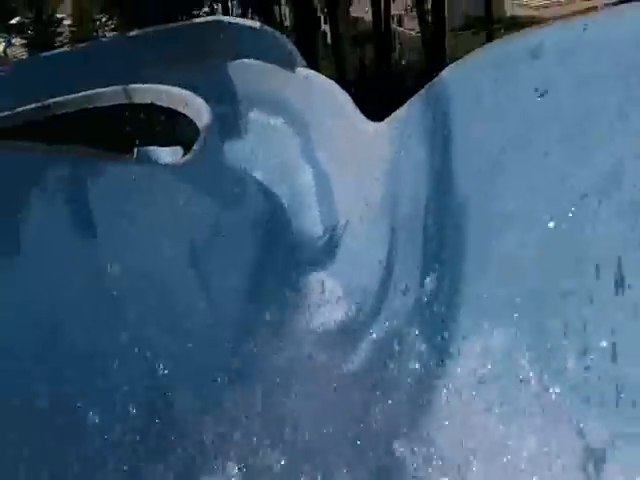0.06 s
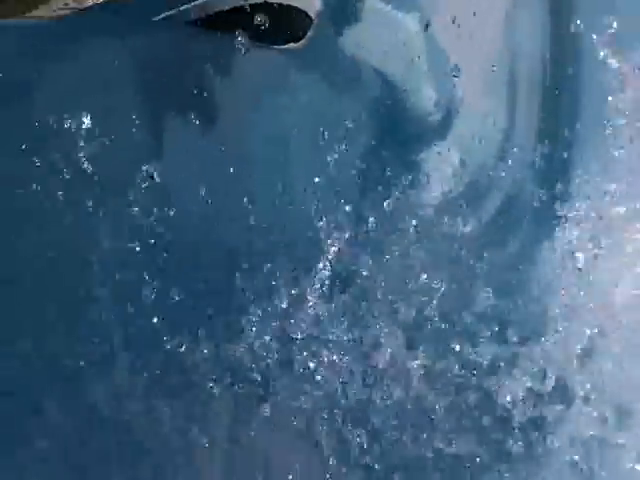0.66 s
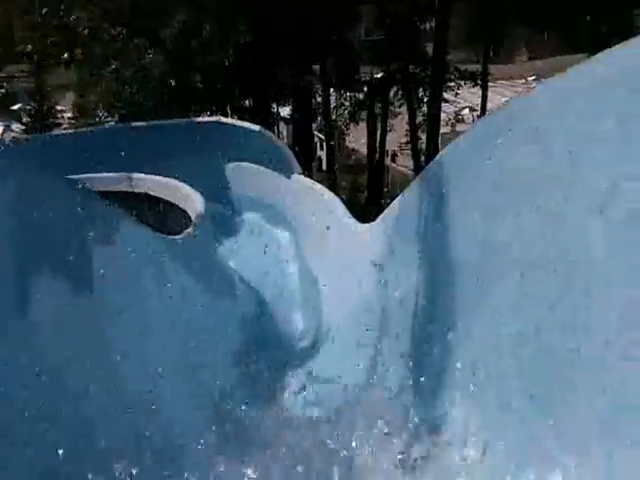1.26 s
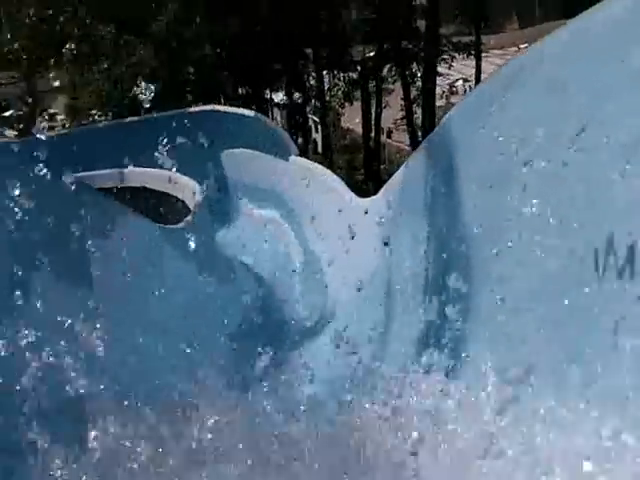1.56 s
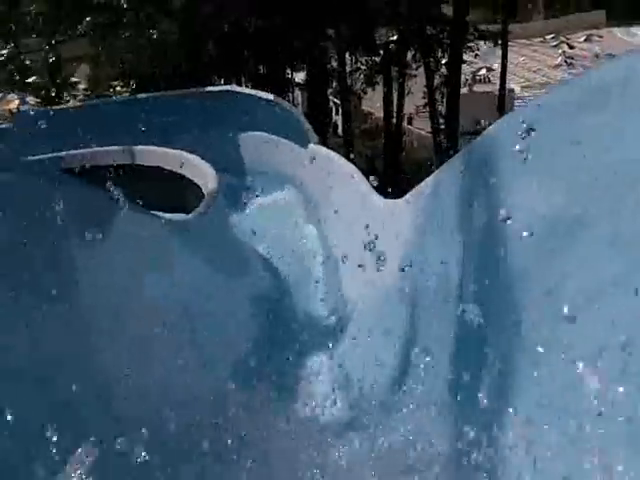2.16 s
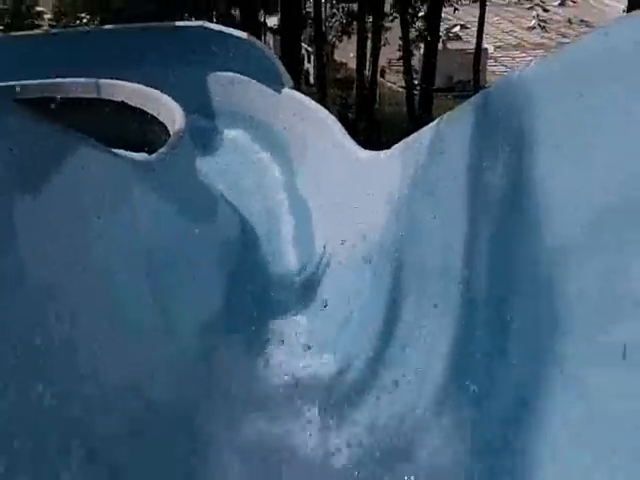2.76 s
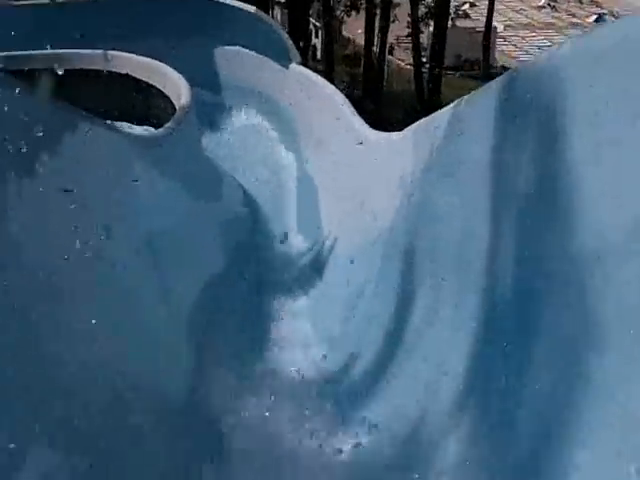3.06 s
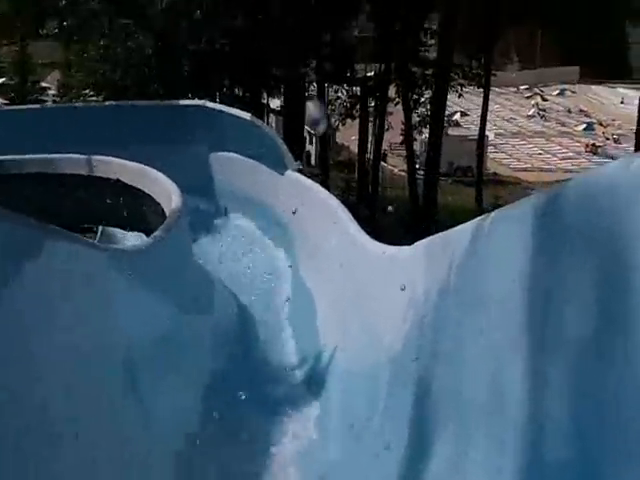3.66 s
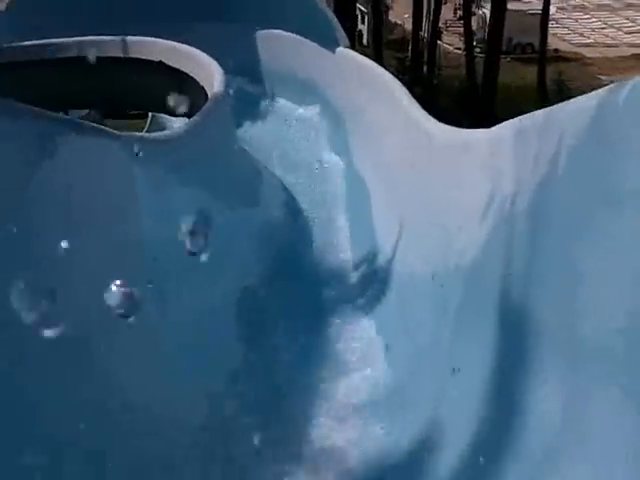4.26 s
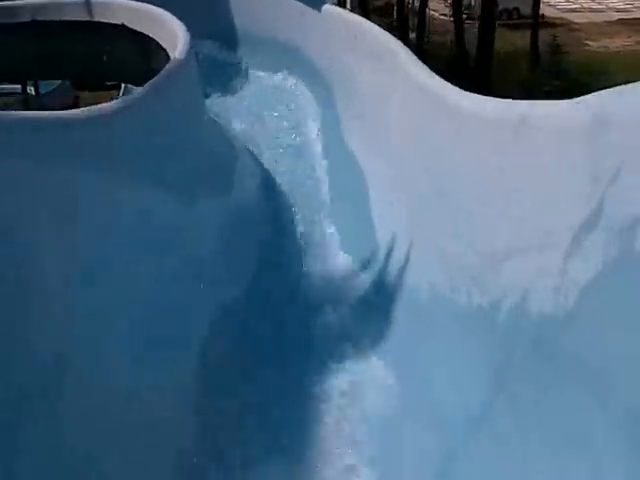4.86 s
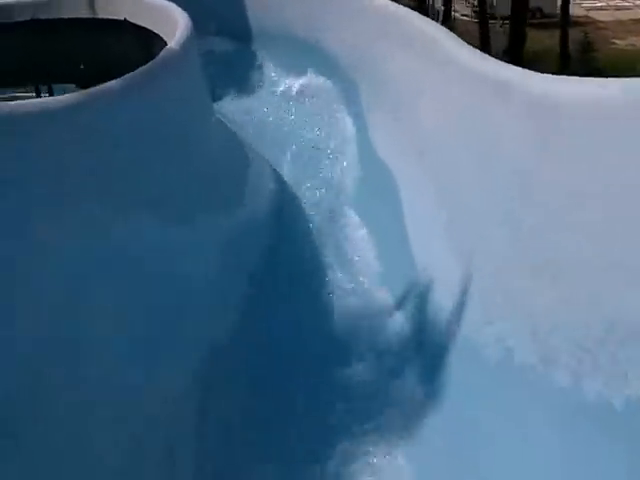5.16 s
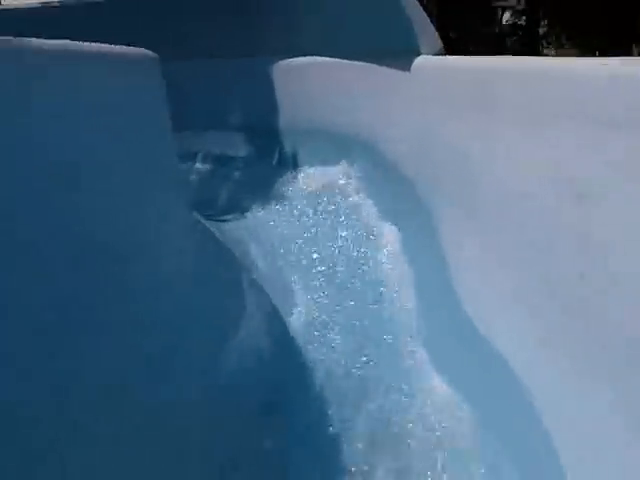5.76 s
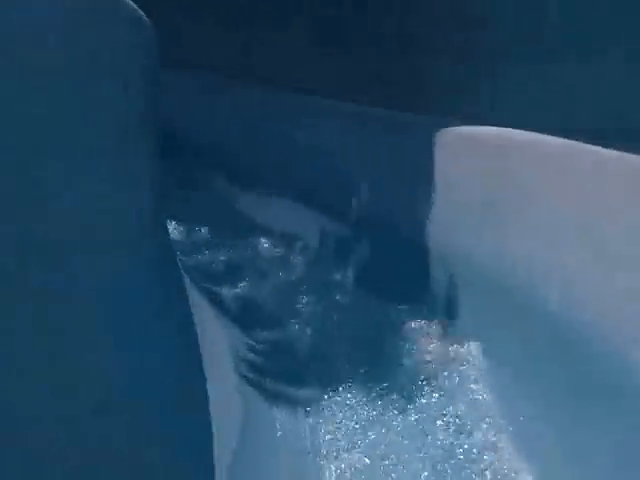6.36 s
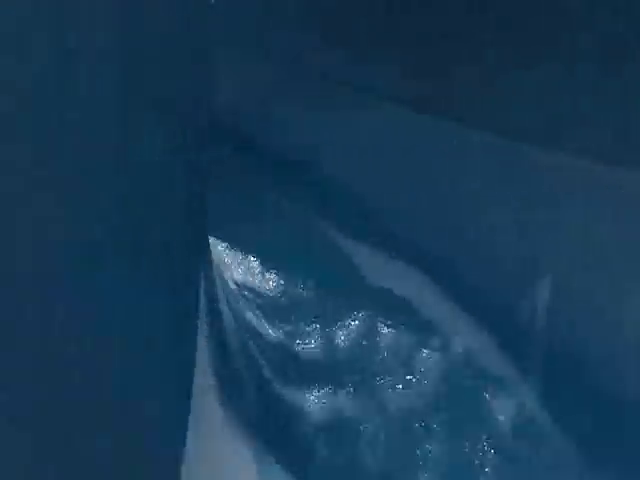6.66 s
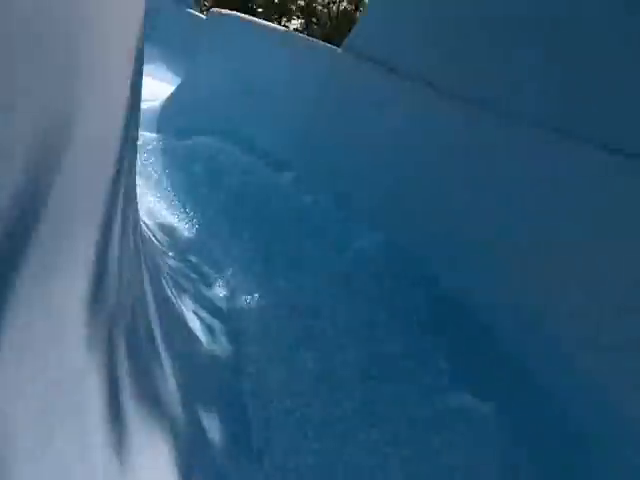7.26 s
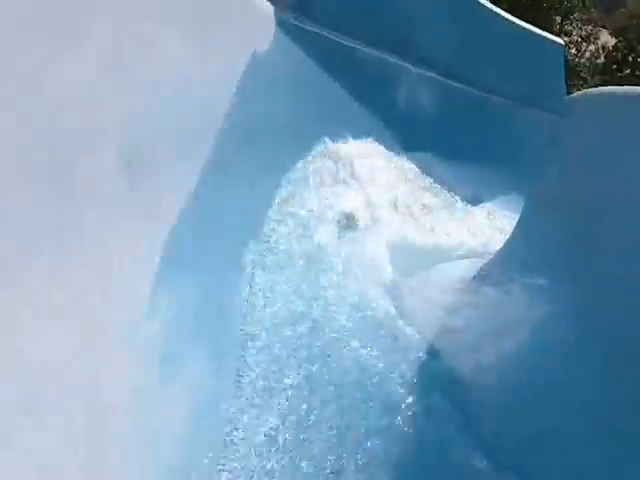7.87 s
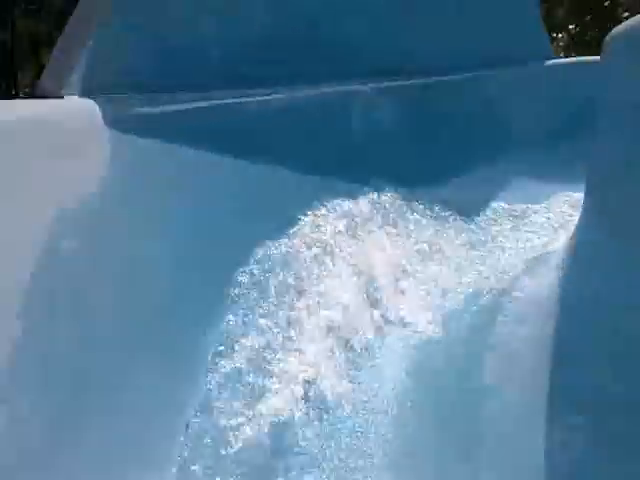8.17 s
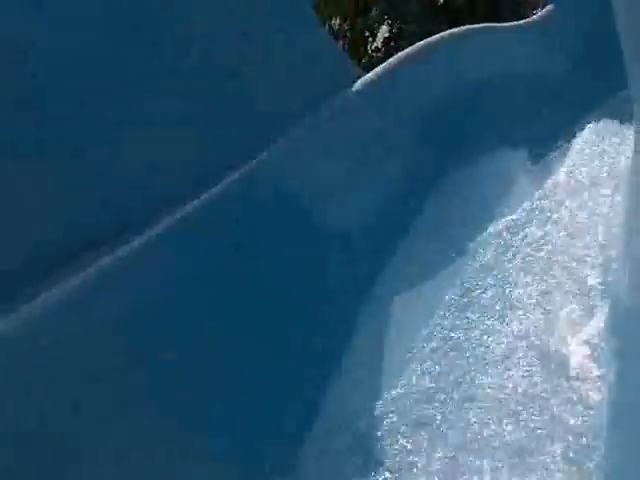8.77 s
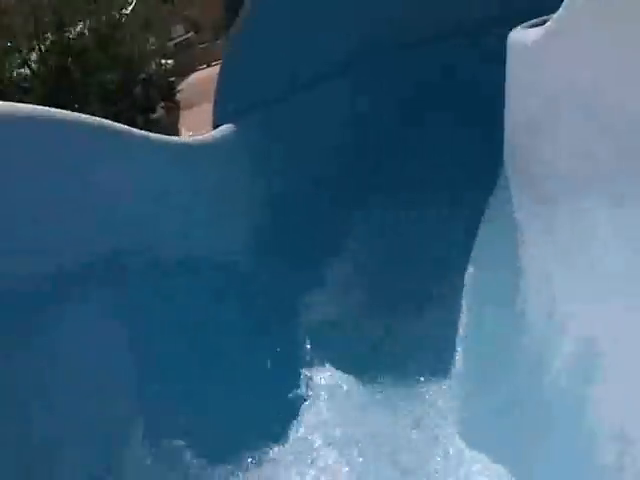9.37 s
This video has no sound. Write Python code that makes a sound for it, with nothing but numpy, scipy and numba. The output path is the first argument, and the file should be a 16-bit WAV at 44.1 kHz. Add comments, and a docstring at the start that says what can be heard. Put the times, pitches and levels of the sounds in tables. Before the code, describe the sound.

Rushing, bubbling water and spattering spray on a ride down a water slide, with wind buffeting the microphone in the second half.

```python
"""Riding a water slide

Water rushes down an open plastic slide, heard from a camera carried along just above the stream.
At first it churns and sprays close by: dense bubbles and droplets over a hiss of foam, with sloshes,
spatters and a few deep gulps of trapped air. From about 5.5 s wind rumbles and thumps on the
microphone, and the camera's gain control ducks the water at every strong gust."""
import sys
import numpy as np
from scipy import signal
from scipy.fft import rfft, irfft
from scipy.io import wavfile
from scipy.ndimage import uniform_filter1d
from numba import njit

SR = 44100
rng = np.random.default_rng(int(sys.argv[2]) if len(sys.argv) > 2 else 0)


def wav_out(sig):
    """Save sig, one row per channel (or a flat mono array), as 16-bit PCM at SR to the path in sys.argv[1]."""
    wavfile.write(sys.argv[1], SR, np.round(np.clip(np.atleast_2d(sig).T, -1, 1) * 32767).astype(np.int16))


N = 423360
T = np.arange(N) / SR
FREQS = np.fft.rfftfreq(N, 1 / SR)


def undb(db):
    """Decibels to gain."""
    return 10 ** (np.asarray(db) / 20)


def unit(x):
    """Scale to rms 1."""
    return x / np.sqrt(np.mean(x ** 2))


def curve(rows, column=1):
    """An automation curve: one column of a table, joined by straight lines in time."""
    rows = np.asarray(rows)
    return np.interp(T, rows[:, 0], rows[:, column])


def colour(x, points):
    """Shape a sound with an EQ curve of (frequency [Hz], gain [dB]) points, then scale to rms 1."""
    hz, db = np.transpose(points)
    eq = undb(np.interp(np.log(FREQS + 1), np.log(hz), db))
    return unit(irfft(rfft(x) * eq, N))


def split(x, hz, order=3):
    """Crossover: the parts of a sound below and above a frequency."""
    low = irfft(rfft(x) / (1 + (FREQS / hz) ** (2 * order)), N)
    return low, x - low


def wander(rate_hz):
    """Random modulation at rms 1, gliding to a new value rate_hz times a second."""
    hold = max(int(SR / rate_hz), 2)
    steps = rng.standard_normal(N // 20)[np.arange(N) // hold % (N // 20)]
    return unit(uniform_filter1d(steps, hold))


def decay(hits, decay_s):
    """Give every impulse an exponential tail."""
    return signal.lfilter([1], [1, -np.exp(-1 / (decay_s * SR))], hits)


@njit
def ring(starts, hz, cycles, amplitudes, glide):
    """Bubbles: damped sines that fall 60 dB over their cycles and rise in pitch near the surface."""
    out = np.zeros(N)
    for k in range(len(starts)):
        first, length = int(starts[k] * SR), int(cycles[k] * SR / hz[k]) + 1
        turn = 2 * np.pi * hz[k] / SR
        phasor = amplitudes[k] + 0j
        step = np.exp(1j * turn - np.log(1000) / length)
        bend = np.exp(1j * turn * glide / length)
        for i in range(first, min(first + length, N)):
            phasor *= step
            step *= bend
            out[i] += phasor.imag
    return out


def bubbles(count, low_hz, high_hz, cycles, spread_db, glide):
    """A cloud of bubbles of all sizes, most faint and a few loud, with equal power per Hz."""
    when, pitch, life, luck, polarity = rng.random((count, 5)).T
    hz = low_hz + (high_hz - low_hz) * pitch  # small bubbles far outnumber big ones
    amplitudes = np.sign(polarity - .5) * np.sqrt(hz) * undb(-spread_db * np.log(luck + .02))
    return unit(ring(when * N / SR, hz, cycles * (.5 + life), amplitudes, glide))


def slaps(count, decay_s, spread_db):
    """Water slaps the chute, each hit throwing a short burst of droplets."""
    when, luck = rng.random((count, 2)).T
    strength = undb(-spread_db * np.log(luck + .01))
    power = decay(np.bincount((when * N).astype(int), strength ** 2, N), decay_s)
    return unit(np.sqrt(power) * rng.standard_normal(N))


def water():
    """The rush of foam, bubbles, droplets and slaps; deep churn and fine spray swell on their own."""
    # EQ of the rushing water: (frequency [Hz], gain [dB])
    water_eq = [(30, -22), (100, -2), (185, 0), (260, 0.5), (360, 3), (500, 0.16), (850, -2), (1100, -3),
                (2400, -4.5), (3300, -4), (4850, 0.16), (7000, -2), (9900, 1), (12000, -53)]
    # fader moves along the slide: (time [s], whole rush [dB], churn trim [dB], spray trim [dB])
    faders = [(0, -24, -5, 5.5), (.6, -24, 0, 1.5), (1.0, -25, -2.5, 4), (1.5, -25, -3.5, 5.5),
              (2.2, -24.5, -2, 5), (2.7, -25.5, -4, 6.5), (3.4, -24, -2, 4), (4.5, -24, -2, 3.5),
              (5.4, -24, -1, 2), (5.8, -26, -5, 0), (6.5, -25.5, -2, 2), (7.4, -26, -1, -1),
              (8.1, -24.5, -6.5, -0.5), (8.8, -26.5, -6.5, 1.5), (9.6, -27.5, 2, -1)]
    # brief swells as surges run past: (time [s], half length [s], swell [dB])
    surges = [(5.765, .025, 2.5), (5.965, .022, 3), (6.52, .03, 1), (7.06, .025, 1), (7.195, .02, 2),
              (7.805, .03, 1.5), (8.23, .025, 1.5), (8.725, .025, 1.5)]
    foam = undb(-3) * rng.standard_normal(N)
    gurgle = undb(-4.5) * bubbles(24000, 220.5, 5996, cycles=26, spread_db=2.5, glide=.2)
    droplets = undb(-3.5) * bubbles(50000, 894, 11640, cycles=3.95, spread_db=2.5, glide=.1)
    splashes = undb(-4) * slaps(4000, decay_s=0.0025, spread_db=1.5)
    stream = colour(foam + gurgle + droplets + splashes, water_eq)
    deep, rest = split(stream, hz=720)
    middle, rest = split(rest, hz=2900)
    fine, mist = split(rest, hz=6740, order=8)
    rush_db, churn_db, spray_db = (curve(faders, column) for column in (1, 2, 3))
    surge_db = sum(db * np.exp(-((T - s) / length) ** 2) for s, length, db in surges)
    deep = deep * undb(churn_db + 3.5 + 1.05 * wander(18))
    middle = middle * undb(1.74 - spray_db / 2 + 1.1 * wander(26))
    mist = mist * undb(spray_db - 17)  # the smallest drops fade first when the spray thins
    fine = (fine + mist) * undb(spray_db / 2 - 0.8 + 0.5 * wander(70))
    return (deep + middle + fine) * undb(rush_db + surge_db + 5 + 0.32 * wander(22))


def patter():
    """Spray rains back on the wet plastic: single sharp ticks of a few cycles."""
    # fader for the falling spray: (time [s], level [dB])
    fader = [(0, -32), (.65, -44.5), (1.4, -32), (3.0, -32), (4.4, -35), (5.6, -53.5), (9.6, -55)]
    ticks = bubbles(1500, 3000, 7000, cycles=6, spread_db=3.2, glide=.1)
    softened, _ = split(ticks, hz=9500, order=4)
    return softened * undb(curve(fader))


def wind_strength(wander_db=1.95, attack_s=0.008, release_s=0.016):
    """Level of the wind in dB: each gust rises quickly, holds and dies back into the breeze."""
    # the bed of breeze: (time [s], level [dB])
    breeze = [(0, -30.5), (1.35, -37), (2.2, -32.5), (3.3, -34), (4.0, -30), (4.7, -33.5), (5.4, -28),
              (6.1, -24), (7.3, -18), (7.9, -19), (8.6, -19), (9.05, -22), (9.6, -19.5)]
    # gusts on top of it: (start [s], hold [s], level [dB])
    gusts = [(0.567, 0.02, -27), (0.70, 0.05, -23), (.832, .012, -25), (2.735, 0.025, -26),
             (3.8, 0.13, -31), (4.46, .03, -22), (4.932, 0.03, -22), (5.055, .025, -21),
             (5.522, 0.034, -20.5), (5.63, 0.062, -13.5), (5.856, 0.02, -10), (5.982, 0.025, -11.5),
             (6.125, .025, -13.5), (6.205, 0.07, -12), (6.39, 0.045, -15), (6.598, .025, -8.5),
             (6.68, 0.02, -12.5), (6.726, 0.02, -13), (6.772, .02, -14), (6.845, 0.03, -13),
             (6.908, .025, -11), (6.975, .015, -15), (7.078, .014, -10), (7.136, 0.025, -15),
             (7.215, .04, -13.5), (7.286, 0.08, -3.5), (7.421, 0.125, -10.5), (7.625, 0.044, -9),
             (7.713, 0.026, -11.5), (7.822, 0.02, -10), (8.072, 0.08, -15), (8.258, 0.2, -12.5),
             (8.285, 0.045, -5.5), (8.52, 0.03, -9), (8.628, 0.055, -13), (8.76, 0.025, -13),
             (8.865, .018, -10), (9.003, 0.025, -16), (9.125, 0.032, -17), (9.198, 0.14, -19),
             (9.44, 0.07, -11), (9.576, 0.033, -14)]
    power = undb(curve(breeze) + wander_db * wander(12)) ** 2
    for start, hold, db in gusts:
        rise = np.clip(1 + (T - start) / attack_s, 0, 1)
        fall = np.exp(-np.clip((T - start - hold) / release_s, 0, 20))
        power += (undb(db) * rise * fall) ** 2
    return 10 * np.log10(power)


def wind(wind_db, evenness=0.71):
    """Turbulence rumbles on the microphone: stronger wind sheds smaller eddies and flutters more."""
    # EQ of light wind: (frequency [Hz], gain [dB])
    breeze_eq = [(15, -39), (26, -13), (40, 0.5), (85, -2.5), (140, -9.5), (250, -18), (600, -35),
                 (2000, -71)]
    # EQ of strong wind: (frequency [Hz], gain [dB])
    gust_eq = [(15, -29), (26, -13), (39, 3), (95, -2.5), (160, -7), (220, -14), (330, -19), (500, -29.5),
               (1000, -35.5), (3000, -87)]
    breeze = colour(rng.standard_normal(N), breeze_eq)
    eddies = rng.standard_normal(N) * undb(2.8 * wander(130))
    gust = colour(eddies, gust_eq)
    local_power = uniform_filter1d(gust ** 2, size=2400)
    gust = unit(gust / local_power ** (evenness / 2))  # a gust pushes evenly while it lasts
    gust_share = 1 / (1 + np.exp(-(wind_db + 23) / 2))  # crossfade centred on -23 dB
    pressure = np.sqrt(1 - gust_share) * breeze + np.sqrt(gust_share) * gust
    pressure = unit(np.tanh(pressure / 3.4))  # the biggest swings flatten
    return pressure * undb(wind_db)


def spatters(decay_s=0.0047):
    """A handful of drops lands near the microphone: a short, bright crackle."""
    # drops landing: (time [s], relative level [dB])
    landings = [(.305, -17), (.636, -15), (.72, -18), (.945, -19), (.996, -21), (1.262, -18), (1.343, -18),
                (1.359, -18), (1.402, -21), (1.472, -16), (1.547, -19), (1.591, -16), (1.648, -17),
                (1.82, -18), (1.864, -19), (1.956, -20), (2.024, -12.5), (2.378, -16.5), (2.397, -19),
                (2.458, -18), (2.801, -18), (2.929, -16), (2.98, -16), (3.037, -18), (3.47, -19),
                (3.774, -19), (4.285, -17), (7.978, -22), (8.724, -21), (8.822, -25), (8.992, -21),
                (9.084, -15.5), (9.189, -26)]
    # EQ of a spatter: (frequency [Hz], gain [dB])
    spatter_eq = [(400, -14), (2000, -9), (4600, 9), (7000, -10), (12000, -44)]
    times, db = np.transpose(landings)
    hits = np.bincount((times * SR).astype(int), undb(db), N)
    envelope = uniform_filter1d(decay(hits, decay_s), size=200)
    return colour(rng.standard_normal(N), spatter_eq) * envelope * undb(3)


def sloshes(count=160, cycles=17.0):
    """A sheet of water folds over and traps many bubbles of about one size, singing in one band."""
    # sheets washing up the wall: (time [s], half length [s], centre pitch [Hz], pitch spread [Hz],
    # level [dB], climb [octaves per half length])
    sheets = [(.48, 0.13, 620, 260, -25.5, -.1), (0.71, 0.1, 400, 150, -27, .1),
              (1.03, 0.31, 2000, 200, -27, .1), (1.255, .03, 900, 220, -26, .1),
              (1.70, 0.048, 860, 220, -27, .1), (2.17, 0.04, 850, 248, -26, .2),
              (2.431, 0.014, 860, 120, -22.5, .4), (2.454, 0.008, 1850, 200, -25, .15),
              (3.15, 0.055, 940, 300, -27, .1), (3.505, 0.037, 800, 260, -25, .1),
              (4.59, 0.028, 1110, 400, -25, .1), (5.43, 0.05, 950, 250, -27, .1),
              (5.765, 0.028, 1270, 70, -29, .1), (5.775, 0.052, 1600, 110, -27, .1),
              (6.3, .22, 330, 50, -29.5, .05), (8.054, 0.18, 620, 100, -28, .05),
              (9.404, 0.17, 780, 220, -29, .1)]
    out = np.zeros(N)
    for time, length, hz, spread_hz, db, climb in sheets:
        when, detune = rng.standard_normal((count, 2)).T.clip(-2.5, 2.5)
        starts = np.maximum(time + length * when / 2, 0)
        pitch = np.maximum(hz + spread_hz * detune, hz / 2) * 2 ** (climb * when / 2)
        polarity = rng.choice([-1., 1.], count)
        fizz = ring(starts, pitch, np.full(count, cycles), polarity, glide=0.17)
        out += undb(db) * fizz * np.sqrt(length * SR / np.sum(fizz ** 2))
    return out


def gulps(swell_s=0.00397):
    """A large trapped pocket of air swells and rings low for a moment, rising a little in pitch."""
    # air pockets closing under water: (time [s], level [dB], pitch [Hz], ring length [cycles])
    pockets = [(0.36, -14, 480, 26), (0.515, -11, 437, 30), (0.556, -13, 480, 16), (0.578, -13, 170, 7),
               (0.628, 0, 269, 20), (0.679, -13, 400, 14), (0.698, -9.5, 180, 7), (0.724, -11, 443, 26),
               (0.833, -9, 370, 18), (2.19, -14, 480, 20), (3.49, -13, 330, 18), (3.84, -13, 362, 20),
               (4.585, -11, 380, 22)]
    out = np.zeros(N)
    for time, db, hz, cycles in pockets:
        t = np.clip(T - time + swell_s, 0, 2 * cycles / hz)
        age = t * hz / cycles
        envelope = (1 - np.exp(-(t / swell_s) ** 2)) * np.exp(-np.log(1000) * age)
        out += undb(db) * envelope * np.sin(2 * np.pi * hz * t * (1 + .1 * age))
    return out


def thumps(wind_db, rebound=0.37, rebound_radians=2.24):
    """An eddy hits as a sharp spike of pressure, then a slower suction, scaled by the wind behind it."""
    # eddies striking the microphone: (time [s], level over the wind [dB], pitch [Hz])
    eddies = [(6.037, 9, 300), (6.198, 10.5, 240), (6.255, 3.5, 130), (6.266, 12, 171), (6.303, 9, 280),
              (6.445, 11, 190), (6.593, 12, 280), (6.645, 8, 260), (6.678, 9.5, 240), (6.951, 13, 240),
              (7.05, 13, 240), (7.211, 5, 220), (7.25, 12, 280), (7.269, 13, 190), (7.36, 2, 330),
              (7.4264, 17.5, 360), (7.454, 12, 380), (7.461, 8, 220), (7.470, 9, 380), (7.571, 8, 250),
              (7.618, 10, 240), (7.627, 11, 192), (7.651, 8.5, 300), (7.705, 12, 260), (7.724, 8, 200),
              (8.095, 6, 190), (8.125, 10, 230), (8.138, 8, 200), (8.161, 11, 240), (8.315, 7, 400),
              (8.367, 6, 300), (8.506, 9, 260), (8.522, 4, 240), (8.615, 12, 220), (8.811, 16.5, 270),
              (8.917, 11, 260), (9.092, 14.5, 210), (9.177, 9, 220), (9.328, 9, 320), (9.453, 7, 171),
              (9.557, 11, 200), (9.575, 14, 220)]
    out = np.zeros(N)
    for time, db, hz in eddies:
        near = np.abs(T - time) < .05
        phase = 2 * np.pi * hz * (T[near] - time)
        spike = np.exp(-phase ** 2)
        suction = np.exp(-(phase / rebound_radians - 1) ** 2)
        out[near] += undb(db + np.interp(time, T, wind_db)) * (spike - rebound * suction)
    return out


@njit
def follow(x, attack, release):
    """Envelope follower with separate rates for rising and falling."""
    out, level = np.empty(len(x)), 0.
    for i in range(len(x)):
        level += (abs(x[i]) - level) * (attack if abs(x[i]) > level else release)
        out[i] = level
    return out


def gain_control(x, ceiling_db=-15, duck_s=0.0035, recover_s=0.024, knee=4):
    """Turn everything down as the level nears the ceiling, so that strong gusts duck the water."""
    level = follow(x, 1 / (duck_s * SR), 1 / (recover_s * SR))
    return x / (1 + (level / undb(ceiling_db)) ** knee) ** (1 / knee)


def scene():
    """Water and wind at one microphone."""
    wind_db = wind_strength()
    slide = water() + patter() + sloshes() + spatters() + gulps()
    return (slide + wind(wind_db) + thumps(wind_db))[None]


def record(dry):
    """The camera rides the gain, notches a few narrow bands, steps the treble down and cuts the top."""
    # narrow dips in the camera's response: (frequency [Hz], width [Hz])
    notches = [(2713, 820), (5512, 900), (7750, 1300), (8000, 1300), (11025, 1500)]
    shelf_hz, shelf_db, top_hz = 5010, -6.5, 13000
    response = np.where(FREQS > shelf_hz, undb(shelf_db), 1)
    for hz, width in notches:
        response = response * (hz ** 2 - FREQS ** 2) / (hz ** 2 - FREQS ** 2 + 1j * width * FREQS)
    ducked = gain_control(dry[0])
    shaped = irfft(rfft(ducked) * response, N)[None]
    high_cut = signal.ellip(8, .2, 70, top_hz, fs=SR, output="sos")
    return signal.sosfilt(high_cut, shaped)


dry = scene()
out = record(dry)
wav_out(out)
```